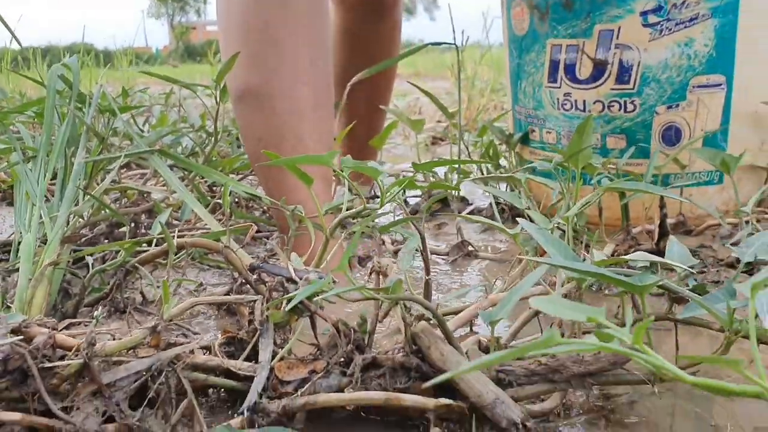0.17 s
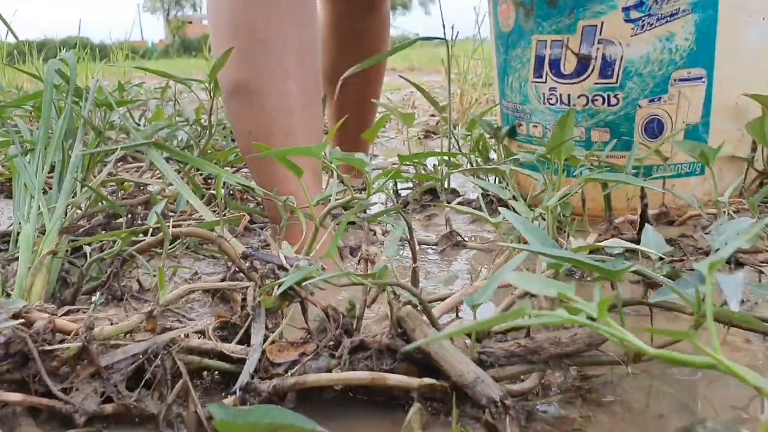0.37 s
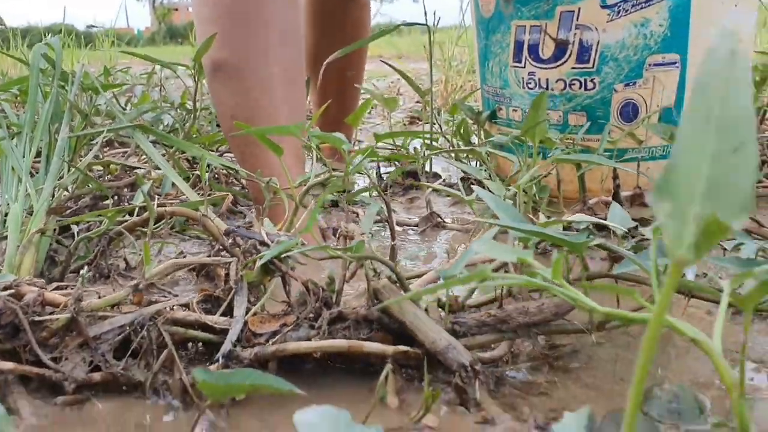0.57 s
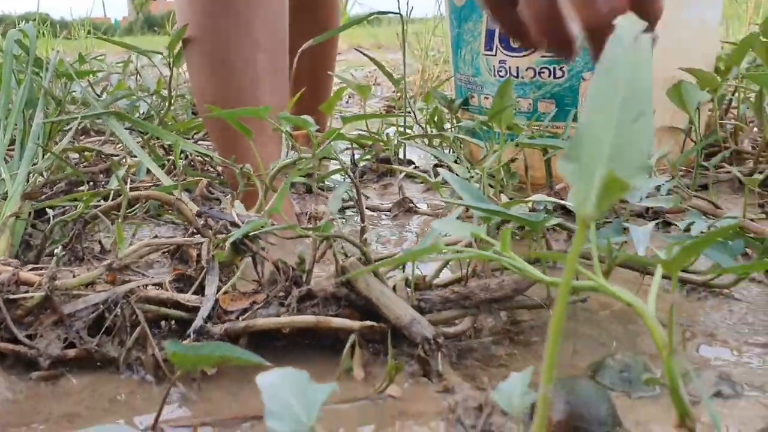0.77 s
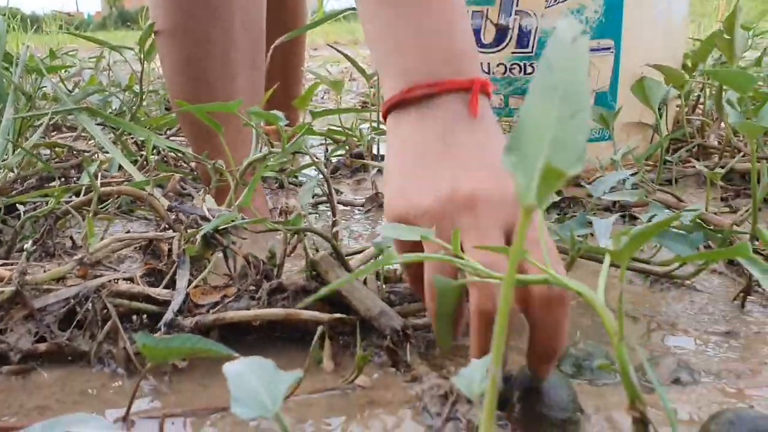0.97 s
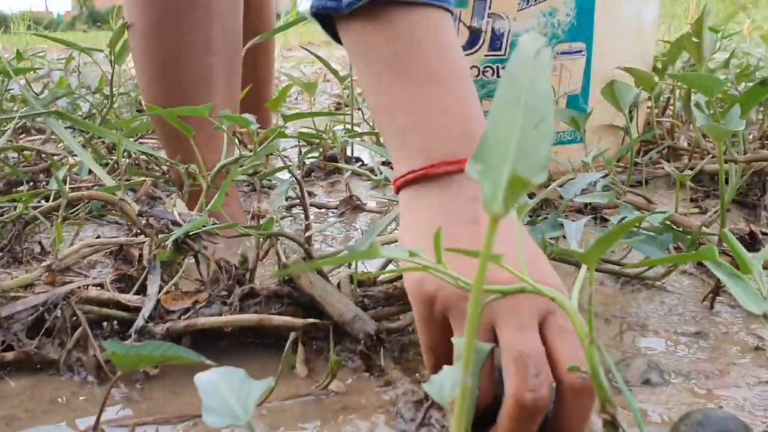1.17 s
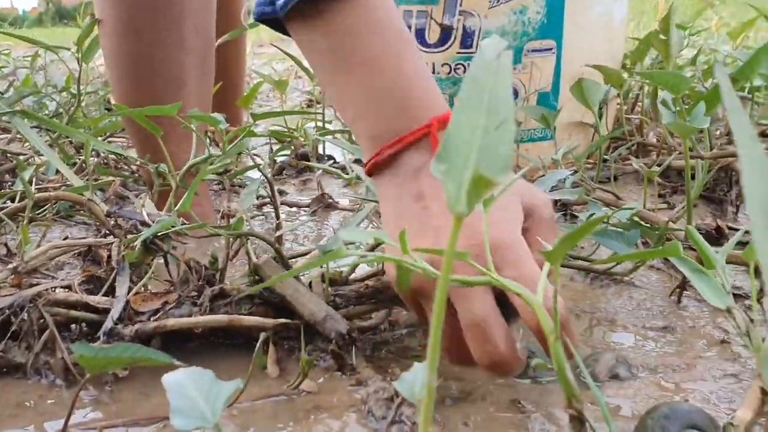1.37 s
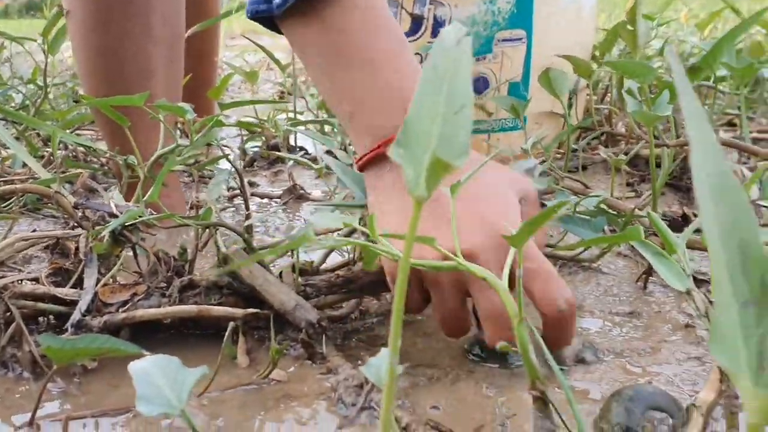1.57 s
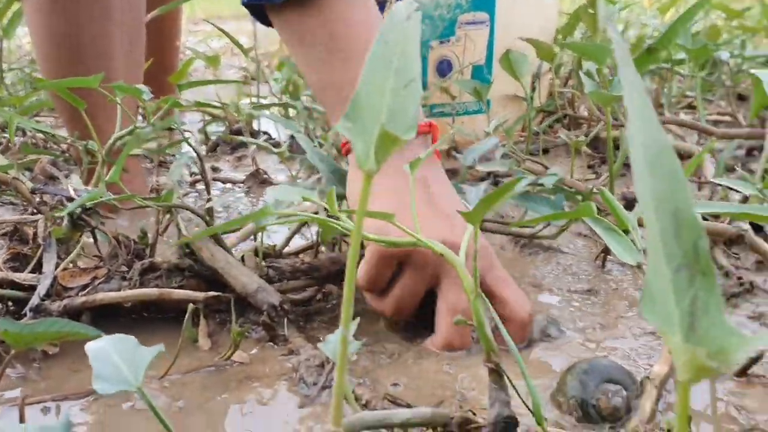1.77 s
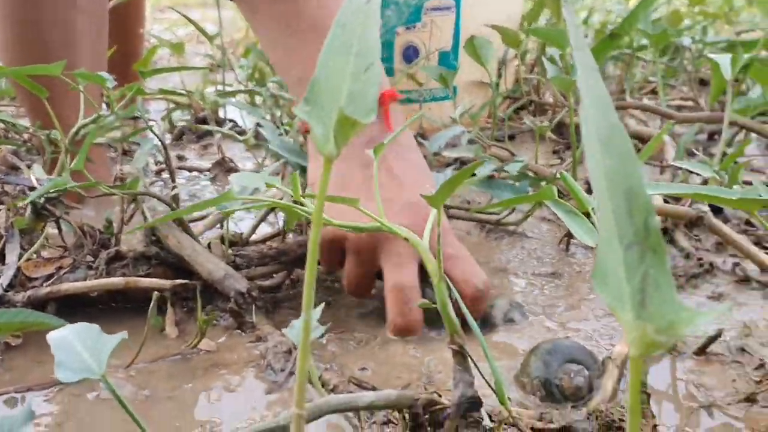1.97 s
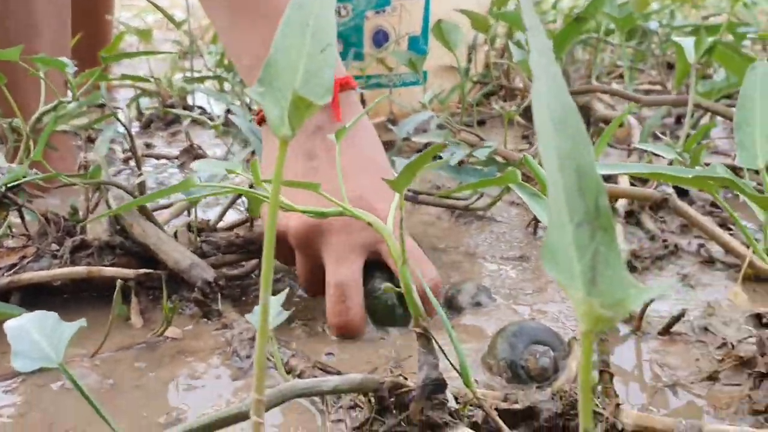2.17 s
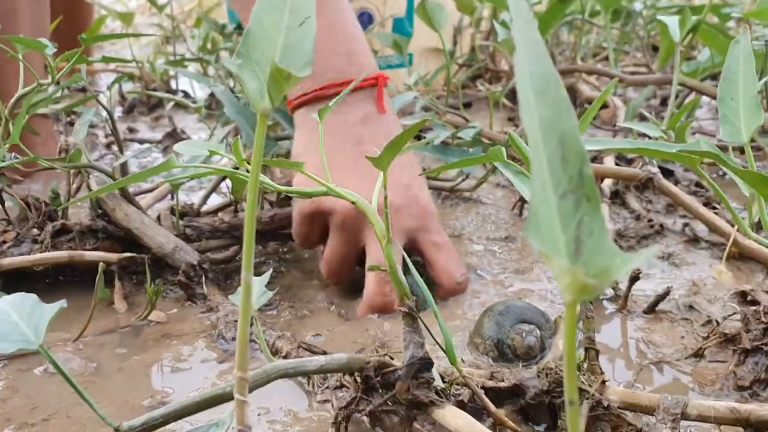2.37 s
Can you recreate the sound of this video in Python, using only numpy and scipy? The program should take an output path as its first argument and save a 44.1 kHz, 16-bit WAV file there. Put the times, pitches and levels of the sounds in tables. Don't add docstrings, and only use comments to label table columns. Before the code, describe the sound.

A snail shell drops into a plastic pail with a hollow clattering knock, then quiet muddy rustling

```python
import sys
import numpy as np
from scipy import signal
from scipy.fft import rfft, irfft
from scipy.io import wavfile

SR = 44100
rng = np.random.default_rng(int(sys.argv[2]) if len(sys.argv) > 2 else 0)


def gain_from_db(level_db):
    decades = np.asarray(level_db, float) / 20
    return 10 ** decades


def wav_record(signal):
    frames = np.transpose(np.atleast_2d(signal))
    bounded = np.clip(frames, -1, 1)
    quanta = np.round(bounded * 32767).astype(np.int16)
    wavfile.write(sys.argv[1], SR, quanta)


N = 105840


def at_hz(points, hz):
    point_hz, value = np.array(points).T
    return np.interp(np.log(hz), np.log(point_hz), value)


def in_time(rows):
    s, value = np.transpose(rows)
    return np.interp(np.arange(N) / SR, s, value)


def rms_one(x):
    return x / np.sqrt(np.mean(x ** 2) + 1e-20)


def add(out, start_s, x):
    i = int(start_s * SR)
    out[..., i:i + x.shape[-1]] += x[..., :N - i]


def drift(rate_hz):
    r = np.exp(-2 * np.pi * rate_hz * 40 / SR)
    slow = signal.lfilter([1], [1, -2 * r, r * r], rng.standard_normal(N // 40 + 2002))[2000:]
    return np.interp(np.arange(N) / 40, np.arange(len(slow)), rms_one(slow))


def fade(t, t60_s):
    return gain_from_db(-60 * t / t60_s)


def band(x, low_hz, high_hz):
    sos = signal.butter(2, [low_hz, min(high_hz, 0.45 * SR)], "band", fs=SR, output="sos")
    return signal.sosfilt(sos, x)


def grains(per_s, spread_db):
    sizes = gain_from_db(spread_db * np.minimum(rng.exponential(1, N), 4)) * rng.choice([-1, 1], N)
    return rms_one(sizes * (rng.random(N) < per_s / SR))


def stereo_noise(samples=N):
    return rng.standard_normal((2, samples))


def pan(db):
    return gain_from_db([[db / 2], [-db / 2]])


# pitch_hz, likeness (0 to 1)
EAR_LIKENESS = [(60, 1), (250, 0.41), (900, 0.015), (15000, 0.064)]


def coloured(white, spectrum, patchy_db):
    hz = np.maximum(np.arange(N // 2 + 1) * SR / N, 1)
    low_hz, high_hz = spectrum[0][0], spectrum[-1][0]
    alike = np.clip(at_hz(EAR_LIKENESS, hz), 0, 1)
    shape = gain_from_db(at_hz(spectrum, hz)) * (hz > low_hz) * (hz < high_hz)
    mid, side = rfft(white) * shape * np.sqrt([1 + alike, 1 - alike])
    ears = np.array([mid + side, mid - side])
    half_octave = 2 * np.log2(hz)
    out = 0
    for k in range(int(2 * np.log2(low_hz)), int(2 * np.log2(high_hz)) + 2):
        part = np.sqrt(np.clip(1 - abs(half_octave - k), 0, 1))
        out = out + gain_from_db(patchy_db * drift(12.2)) * irfft(part * ears, N)
    return rms_one(out)


# delay_s, level_db
ECHOES = [(.004, -13)]


def place(x, pan_db, lag_s, echo_db):
    n = np.arange(N)
    x = x + np.zeros((2, 1))
    out = np.array([np.interp(n - lag_s * SR, n, x[0]), x[1]])
    dull = gain_from_db(echo_db) * band(x, 300, 7100)
    for delay_s, db in ECHOES:
        add(out[0], delay_s, gain_from_db(db) * dull[1])
        add(out[1], delay_s * 0.99, -gain_from_db(db) * dull[0])
    return out * pan(pan_db)


# pitch_hz, level_db (per Hz)
RUMBLE = [(22, -40), (36, -15), (52, -2.5), (85, -4.5), (125, -3), (160, -16.5), (200, -23)]


def rumble():
    return gain_from_db(-41.5) * coloured(stereo_noise(), RUMBLE, patchy_db=4.0)


# pitch_hz, level_db (per Hz)
FIELD = [(88, -48), (150, -9), (222, -14), (361, -5.5), (422, -10.5), (923, -25.5), (2220, -36),
         (9440, -35), (16000, -44)]


def field_air():
    return gain_from_db(-53.5) * coloured(stereo_noise(), FIELD, patchy_db=-2.5)


# start_s, level_db
BRUSH = [(0, -63), (.08, -59), (.12, -49.5), (.195, -56.5), (.21, -54.5), (.44, -55), (.47, -50.5),
         (.52, -61.5), (.66, -57), (.72, -64), (1.22, -68.5), (1.36, -59.5), (1.52, -67), (1.75, -60.5),
         (1.85, -67.5), (1.92, -62.5), (2.03, -65), (2.4, -70.5)]
# pitch_hz, level_db (per Hz)
RUSTLE = [(300, -1), (800, 0.5), (2000, -8.5), (5500, -11.5), (7500, -11), (11000, -19), (16000, -21)]


def rustle():
    crackles_per_s, crackle_share, patchy_db = 250, 0.35, 2.0
    crackle = np.array([grains(crackles_per_s, 2.6), grains(crackles_per_s, 1.9)])
    leaves = coloured(stereo_noise() + crackle_share * crackle, RUSTLE, patchy_db)
    return gain_from_db(in_time(BRUSH) + 3 + patchy_db * drift(27)) * leaves


# pitch_hz, width_hz, level_db, silent share of each chirp cycle (0 to 1)
INSECTS = [
    (9300, 250, -71, .05),
    (10400, 250, -69, .5),
]


def insects():
    chirps_per_s, first_chirp_s = 9.4, 0.028
    swell_db_per_s, full_s = 7, 1.65
    t = np.arange(N) / SR
    cycle = (chirps_per_s * (t - first_chirp_s)) % 1
    swell_db = swell_db_per_s * np.minimum(t - full_s, 0)
    out = np.zeros((2, N))
    for hz, width_hz, db, silent in INSECTS:
        chirp = np.sqrt(np.clip((cycle - silent) / (1 - silent), 0, 1))
        buzz = rms_one(band(stereo_noise(), hz - width_hz / 2, hz + width_hz / 2))
        out += gain_from_db(db + swell_db) * chirp * buzz
    return out


# start_s, peak_db, top_hz
SNAPS = [(0.067, -41, 14900), (.109, -42, 9000), (.17, -33, 8050), (.178, -40, 8020), (0.199, -33.5, 11900),
         (0.459, -38.5, 8000), (.476, -39, 7500), (.504, -35.5, 14700), (.638, -45, 8000),
         (.677, -43, 6000), (1.031, -50, 6500), (1.246, -44, 6000), (1.341, -43.5, 14000),
         (1.382, -42, 8000), (1.47, -44, 15500), (1.577, -41.5, 8500), (1.74, -35, 8000),
         (1.902, -45, 6000), (1.925, -41, 8000), (1.96, -43.5, 5500), (2.002, -42, 4500),
         (2.101, -47.5, 9850), (2.144, -44, 4500), (2.231, -43, 8500)]


def snaps():
    out, t = np.zeros((2, N)), np.arange(SR // 50) / SR
    for s, db, top_hz in SNAPS:
        burst = fade(t, 0.008) * stereo_noise(len(t))
        add(out, s, gain_from_db(db) * band(burst, top_hz / 3.5, top_hz))
    return out


# start_s, peak_db, pitch_hz, t60_s
DRIPS = [(0.113, -37, 4370, 0.038), (0.129, -40, 4350, 0.033), (0.178, -33, 2940, 0.013),
         (0.705, -38.5, 3182, .015), (.932, -39.5, 2160, 0.012), (1.319, -48, 1122, 0.11),
         (1.395, -44, 1460, 0.018), (1.48, -38.5, 3510, 0.017), (1.7248, -23.5, 3060, 0.018),
         (1.7258, -18, 353, 0.0096), (1.7252, -20, 3780, 0.014), (1.74, -17.5, 3090, 0.0078),
         (1.748, -41.5, 2920, 0.022), (1.931, -44, 2480, 0.014), (1.96, -28, 1290, 0.0057),
         (2.143, -32, 2600, 0.0072), (2.203, -27.5, 2210, 0.017), (2.229, -46, 3570, 0.02),
         (2.315, -46, 7300, 0.016), (1.726, -32, 2400, 0.01), (1.902, -43.5, 1650, 0.017),
         (2.333, -48, 2900, .015)]


def drips():
    rise_oct_per_s, spit_db, onset_s = 10, -4, 0.001
    out, t = np.zeros((2, N)), np.arange(SR // 12) / SR
    for s, db, hz, t60_s in DRIPS:
        tone = np.sin(2 * np.pi * np.cumsum(hz * 2 ** (rise_oct_per_s * t)) / SR)
        puff = rms_one(band(stereo_noise(len(t)), hz / 1.42, hz * 1.12))
        spit = gain_from_db(spit_db) * fade(t, t60_s) * puff
        onset = 1 - np.exp(-(t / onset_s) ** 2)
        add(out, s, gain_from_db(db) * onset * fade(t, t60_s) * (tone + spit))
    return out


# start_s, peak_db, pitch_hz, t60_s
RINGS = [(.2326, -18.5, 3620, 0.019), (.2326, -22, 2350, .02), (0.233, -31.5, 5685, 0.018),
         (0.2328, -17.5, 1730, 0.038), (0.233, -20.5, 3010, 0.018), (.2405, -34, 2283, 0.033),
         (0.275, -14.5, 1378, 0.023), (.2745, -17, 1970, 0.016), (.2785, -30, 2490, .02),
         (.284, -21, 947, 0.017), (.2975, -16, 727, .03), (.2975, -24, 2770, .03), (.298, -18.5, 1656, .04),
         (0.3033, -12, 2273, 0.025), (.303, -11, 1173, .03), (0.3044, -18, 4000, 0.023),
         (.306, -28.5, 6420, 0.024), (0.306, -13, 2780, 0.03), (0.3075, -24.5, 4580, 0.029),
         (0.3122, -18, 2450, 0.031), (.3155, -4.5, 560, 0.051), (0.317, -29, 3720, .02),
         (0.3167, -12.5, 1570, 0.031), (.317, -28, 4670, 0.022), (0.318, -16, 2480, 0.043),
         (.331, -28, 2380, .02), (0.3312, -24, 1163, 0.018), (0.3352, -26.5, 1860, 0.028),
         (.3415, -26, 1063, 0.035), (.351, -29, 1378, 0.018), (.354, -32, 2700, 0.035),
         (.3585, -8, 533, 0.053), (.370, -29, 1120, 0.065), (.4205, -34, 3060, .03),
         (.4205, -35, 2530, 0.028), (.4215, -15, 577, 0.05), (.4615, -41, 1162, .025),
         (.4865, -43, 3530, .03), (.512, -44.5, 2970, 0.024)]


def rings():
    rise_s, ear_gap_rad = 0.00061, 1
    ears = np.array([[0.5], [-0.5]])
    out, t = np.zeros((2, N)), np.arange(SR // 10) / SR
    for s, db, hz, t60_s in RINGS:
        start, gap = rng.uniform(-1, 1, 2)
        phase = 2 * np.pi * hz * t + np.pi * start + ear_gap_rad * gap * ears
        onset = 1 - np.exp(-(t / rise_s) ** 2)
        add(out, s, gain_from_db(db) * onset * fade(t, t60_s) * np.sin(phase))
    return out


# pitch_hz, level_db
WALL = [(565, 1), (700, -3), (830, -7.5), (1120, -4), (1540, -6.5), (1750, -6.5), (2070, -7), (2270, -8),
        (2550, -8), (2860, 1.5), (3190, -1.5), (3700, -4), (5250, -29), (6800, -30)]


def wall_t60(hz):
    return 0.056 * (WALL[0][0] / hz) ** 0.7


# start_s, peak_db, favoured pitch_hz, extra level_db of the lowest mode
KNOCKS = [(0.2333, -17.5, 3380, 16.5), (.274, -6.5, 940, -10), (.298, -18, 1610, -35),
          (.305, -14, 3020, -14), (0.314, -12, 1170, 4), (.3195, -10, 2310, 6.5), (.333, -13, 1550, -7),
          (.353, -15.5, 1760, 12), (.360, -12, 1040, 0), (.421, -10.5, 1200, -2), (.459, -35, 2460, 17),
          (.504, -25, 960, -6), (.518, -31, 900, 1.5), (.546, -33, 1490, 5.5), (.559, -26.5, 885, 1),
          (.570, -38.5, 2150, -15), (.600, -31.5, 990, 0), (0.637, -35, 1980, 3), (.677, -37.5, 1500, -5),
          (.752, -31.5, 2210, 11.5), (.799, -41.5, 900, 3.5), (1.032, -48, 810, 5)]


def knocks():
    contact_s, ear_gap_rad, scatter_db = 0.00028, 1.0, 1.5
    crack_db, crack_t60_s = -4, 0.04
    out, t = np.zeros((2, N)), np.arange(SR // 10) / SR
    hz, level_db = np.transpose(WALL)[:, :, None]
    for s, db, hard_hz, first_db in KNOCKS:
        level, tuning, start, gap = rng.normal(0, 1, (4, len(WALL), 1))
        mode_db = level_db + scatter_db * level + first_db * (hz == hz.min())
        ratio = hz / hard_hz
        ring = gain_from_db(mode_db) * ratio / (1 + ratio ** 3.95) * fade(t, wall_t60(hz))
        phase = 2 * np.pi * hz * (1 + 0.023 * tuning) * t + np.pi * start
        ear_gap = ear_gap_rad * np.tanh(gap)
        modes = np.array([(ring * np.sin(phase + ear * ear_gap)).sum(0) for ear in (0.5, -0.5)])
        shared = rng.standard_normal(len(t))
        puff = band(shared + 1.6 * stereo_noise(len(t)), hard_hz / 3, hard_hz * 1.07)
        crack = gain_from_db(crack_db) * fade(t, crack_t60_s) * puff
        add(out, s, gain_from_db(db - 3) * (1 - np.exp(-t / contact_s)) * (modes + crack))
    return out


# start_s, level_db
CLATTER = [
    (.272, -53.5),
    (.276, -27),
    (.29, -30.5),
    (.3, -27),
    (.32, -21),
    (.337, -44.5),
    (.37, -37),
    (.40, -52.5),
    (.425, -42),
    (.45, -68),
]


def clatter():
    shared, left, right = [grains(1500, 3.5) for _ in range(3)]
    clicks = np.array([shared + left, shared + 0.65 * right])
    level_db = in_time(CLATTER)
    struck = clicks * gain_from_db(level_db) + 1e-18
    shells = 0
    for k, (hz, db) in enumerate(WALL):
        r, w = fade(1 / SR, 0.38 * wall_t60(hz)), 2 * np.pi * hz / SR
        gain = (-1) ** k * gain_from_db(0.38 * db) * np.sin(w)
        shells = shells + signal.lfilter([0, gain], [1, -2 * r * np.cos(w), r * r], struck)
    spray = band(stereo_noise() + 0.2 * clicks, 4200, 18000) * gain_from_db(level_db - 14.5)
    return gain_from_db(-17.0) * shells, spray


# start_s, peak_db, pitch_hz, t60_s
BOOMS = [(.2735, -6, 784, 0.017), (0.2756, -1.5, 272, 0.035), (0.289, -15, 227, 0.054),
         (.303, -12, 240.7, 0.08), (0.317, -12.5, 241.5, 0.1), (.352, -24, 214, 0.11),
         (0.361, -7.5, 234.3, 0.079), (.422, -3.5, 250.6, 0.039), (.424, -25, 119.5, 0.097),
         (0.456, -20.5, 241, 0.049), (0.485, -21.5, 115, 0.032), (0.51, -28, 109.7, 0.07),
         (.546, -20, 233, 0.016), (.558, -25, 227.4, 0.16), (0.599, -15.5, 243, 0.024),
         (.633, -26, 221, 0.035), (.796, -35.5, 242, 0.071), (0.936, -43, 237, 0.083)]


def booms():
    out, t = np.zeros(N), np.arange(SR // 5) / SR
    for s, db, hz, t60_s in BOOMS:
        swell = (1 - np.exp(-t / 0.0016)) ** 2
        add(out, s, gain_from_db(db + 4.5) * swell * fade(t, t60_s) * np.sin(2 * np.pi * hz * t))
    return out


# start_s, peak_db, from_hz, length_s, to_hz
SQUELCH = (1.341, -53, 1500, .023, 3800)


def squelch():
    out = np.zeros((2, N))
    s, db, from_hz, length_s, to_hz = SQUELCH
    share = np.arange(int(length_s * SR)) / (length_s * SR)
    glide_hz = from_hz + (to_hz - from_hz) * share
    tone = np.sin(2 * np.pi * np.cumsum(glide_hz) / SR)
    add(out, s, gain_from_db(db) * np.sin(np.pi * share) ** 0.5 * tone)
    return out


def scene():
    shells, spray = clatter()
    field = (rumble() + field_air() + rustle() + insects() + spray) * pan(-3)
    hand = snaps() + drips() + squelch()
    pail = rings() + knocks() + shells + booms()
    near_hand = place(hand, pan_db=-6, lag_s=0.0001, echo_db=-6)
    near_pail = place(pail, pan_db=-4, lag_s=0.00013, echo_db=0)
    return field + near_hand + near_pail


def band_limit(x):
    return signal.sosfilt(signal.butter(12, 15900, fs=SR, output="sos"), x)


def record(dry):
    ceiling, cutoff_hz = 1.5, 15900
    rounded = ceiling * np.tanh(dry / ceiling)
    low_pass = signal.ellip(10, 0.5, 70, cutoff_hz, fs=SR, output="sos")
    mix = signal.sosfilt(low_pass, rounded)
    return band_limit(mix)


dry = scene()
out = record(dry)
wav_record(out)
```